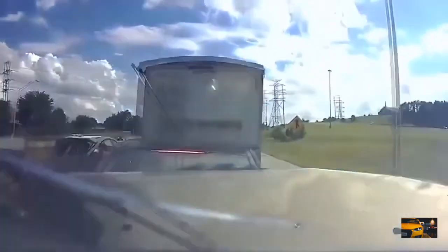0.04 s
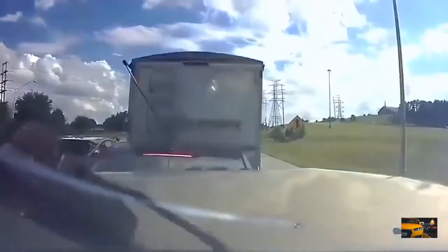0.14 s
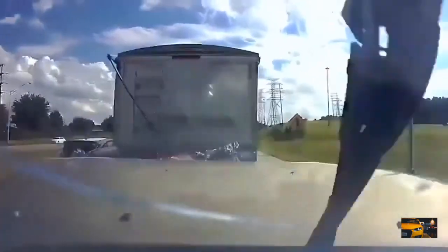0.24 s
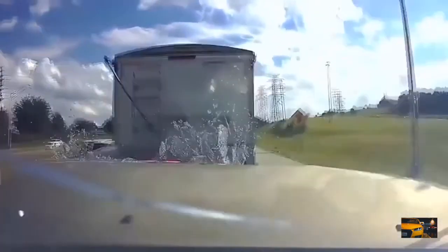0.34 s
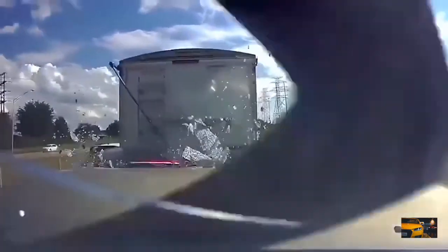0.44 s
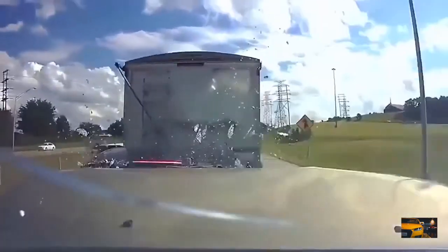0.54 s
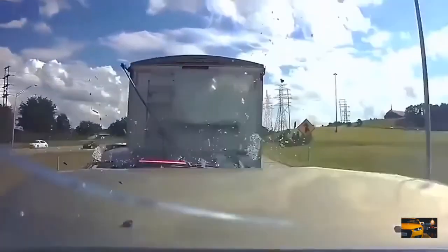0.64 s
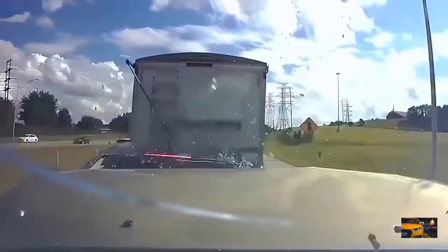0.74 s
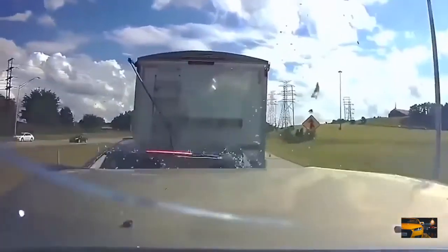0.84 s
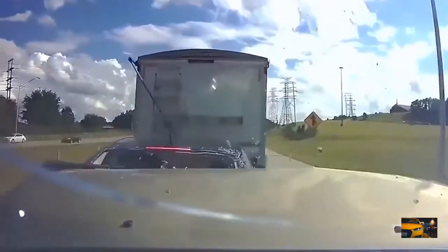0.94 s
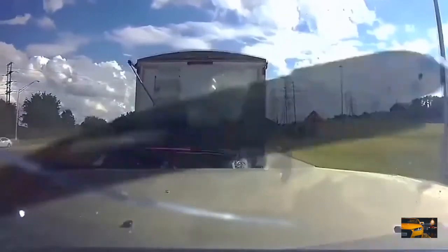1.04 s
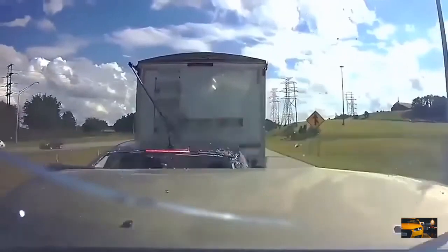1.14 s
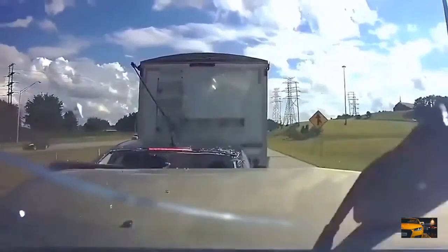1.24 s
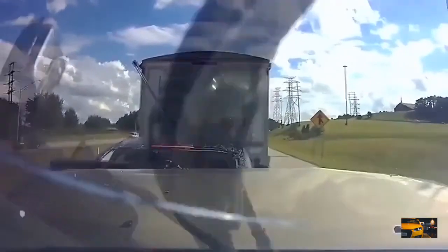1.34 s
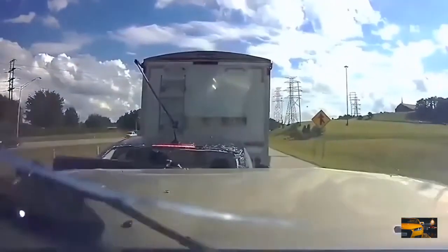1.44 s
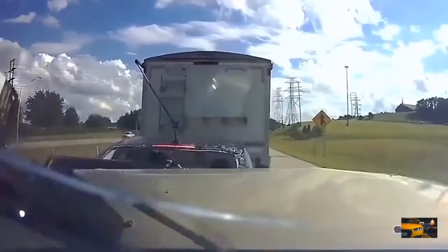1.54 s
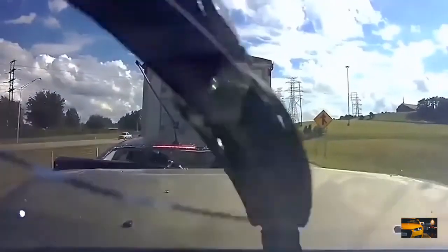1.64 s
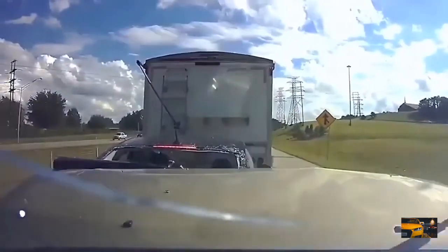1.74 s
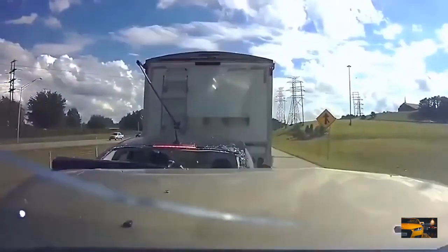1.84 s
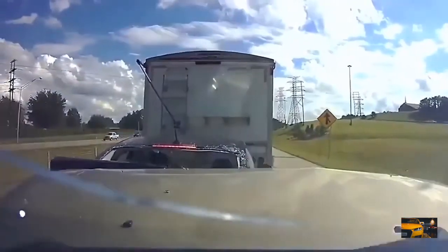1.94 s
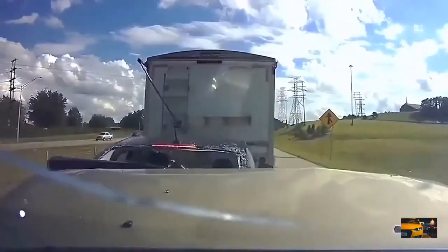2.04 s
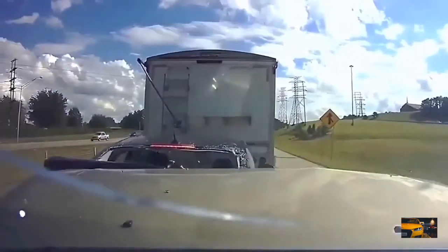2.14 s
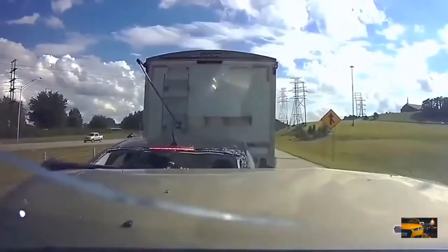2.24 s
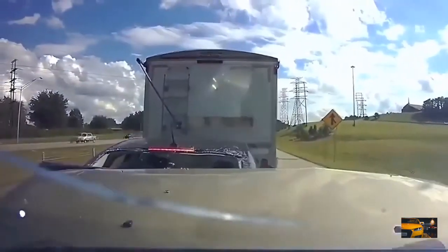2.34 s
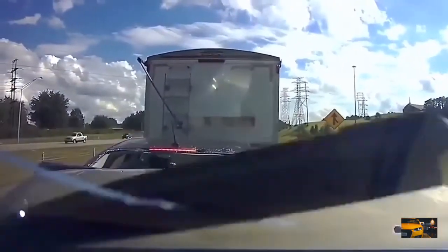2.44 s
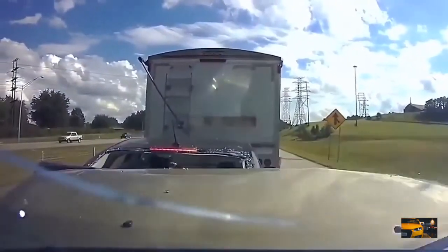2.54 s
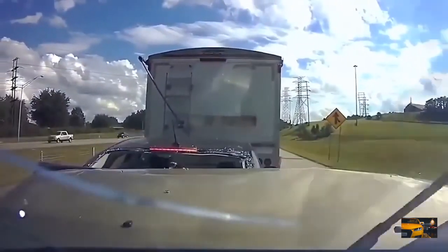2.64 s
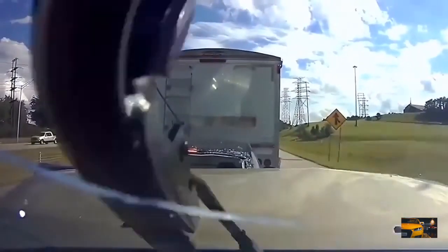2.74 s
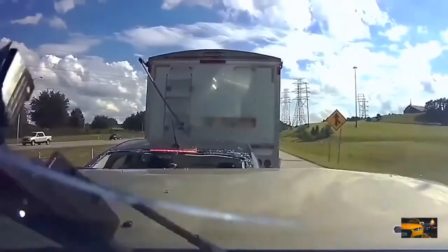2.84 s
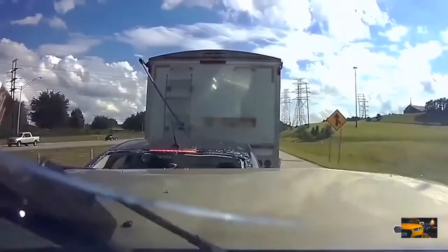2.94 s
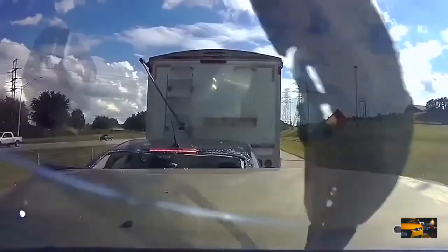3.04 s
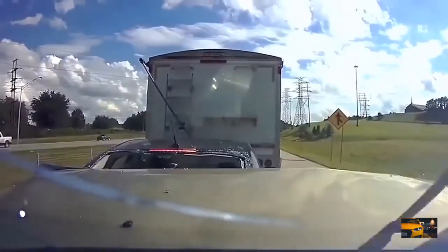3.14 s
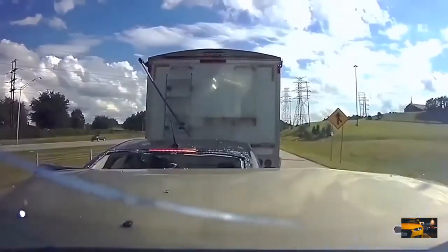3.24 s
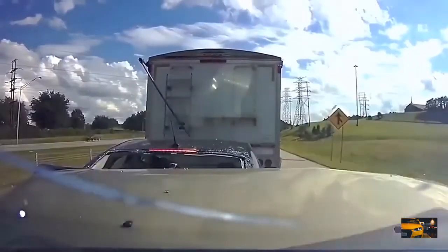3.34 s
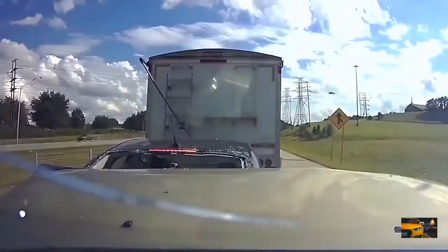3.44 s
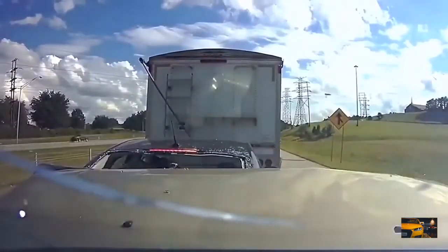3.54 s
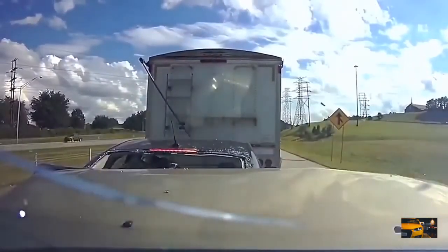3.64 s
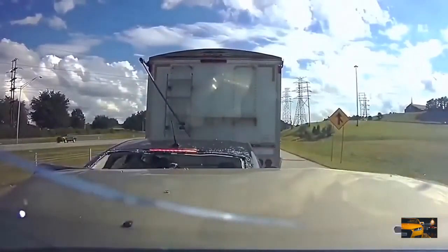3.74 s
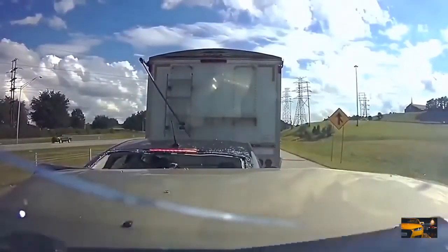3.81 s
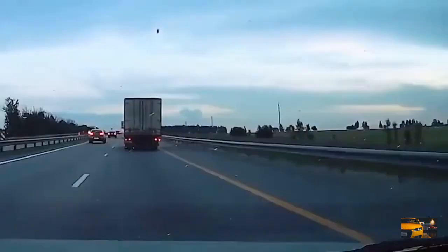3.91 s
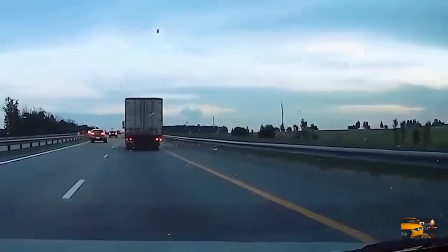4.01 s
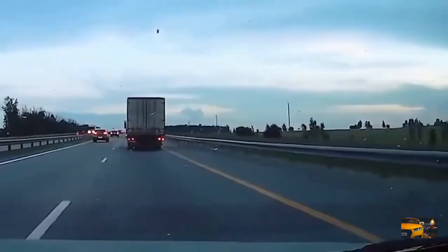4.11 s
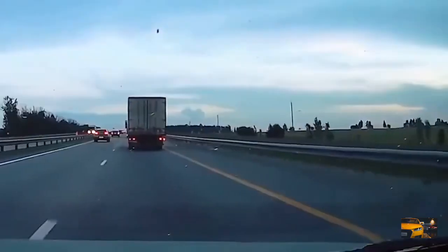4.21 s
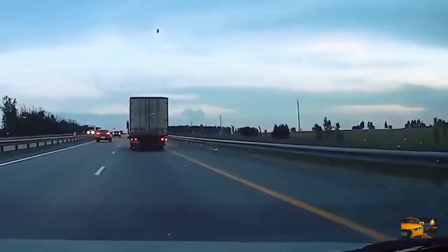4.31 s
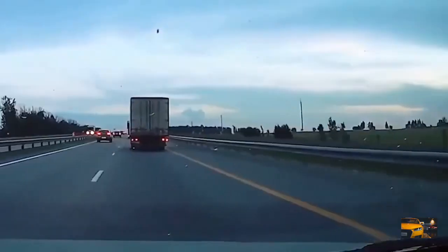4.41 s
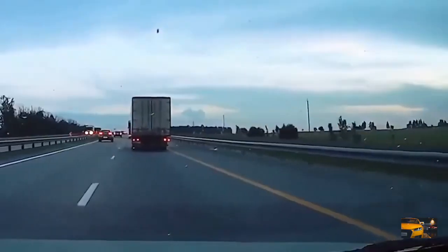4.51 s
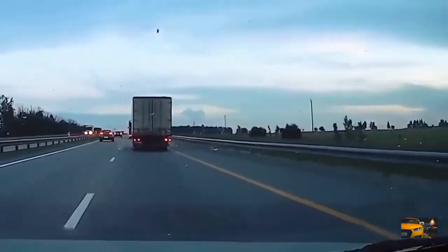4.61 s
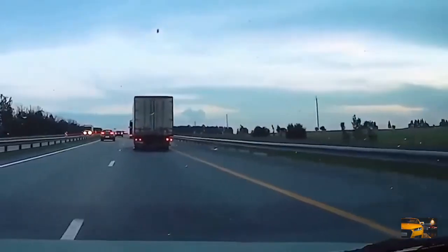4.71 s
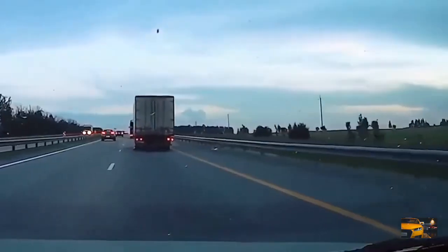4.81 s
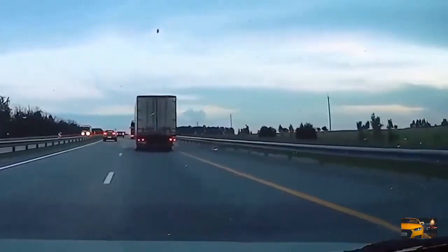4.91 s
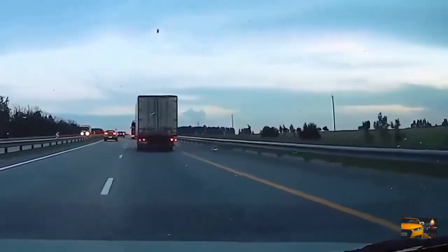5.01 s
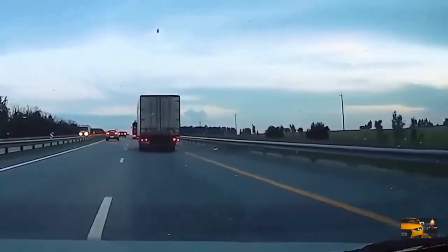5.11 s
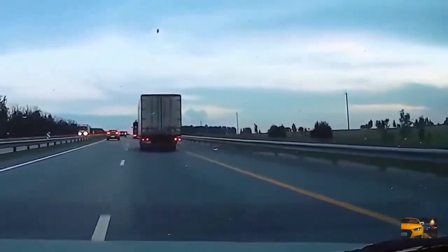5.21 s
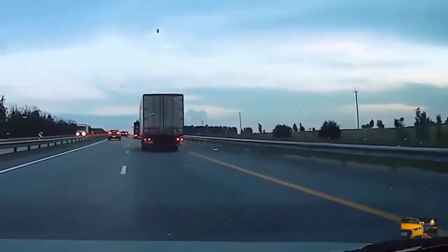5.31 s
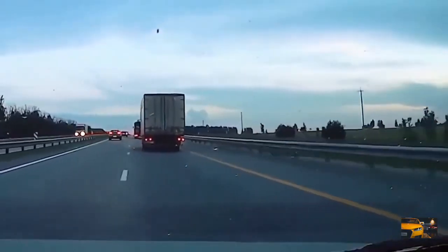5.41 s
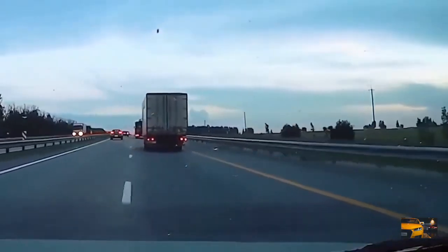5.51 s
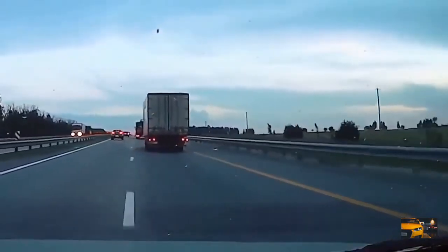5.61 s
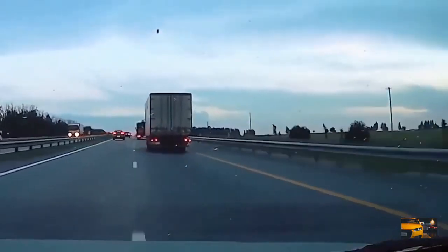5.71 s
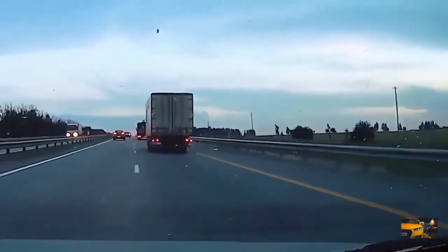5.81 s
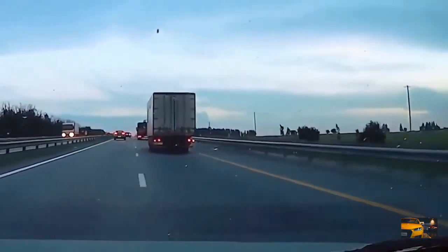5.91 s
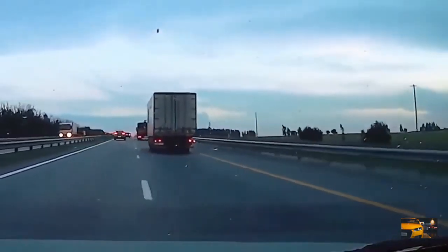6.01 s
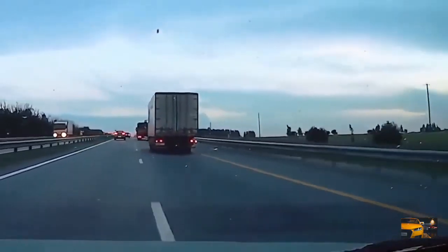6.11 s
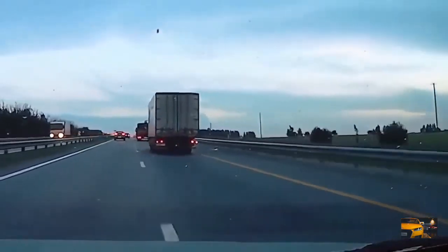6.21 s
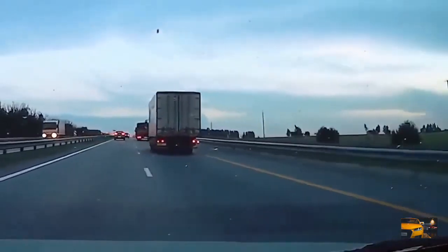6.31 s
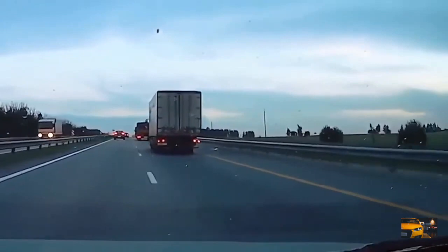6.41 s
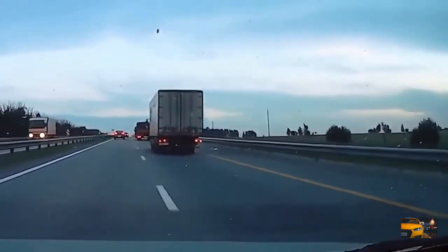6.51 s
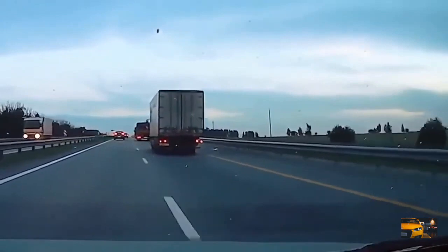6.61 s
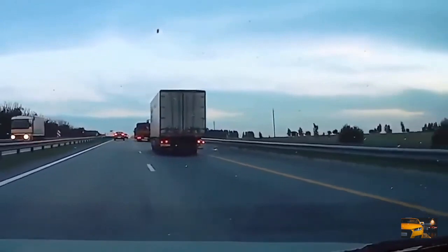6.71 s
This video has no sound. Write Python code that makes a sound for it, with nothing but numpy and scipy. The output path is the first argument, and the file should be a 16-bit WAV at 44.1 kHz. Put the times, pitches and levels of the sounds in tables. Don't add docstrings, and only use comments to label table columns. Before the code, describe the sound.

Violent vehicle impact with buckling metal and pouring shards settles into a faint idle, then switches instantly to quieter tyre roar and engine hum with grit ticks.

```python
import sys
import numpy as np
from scipy import signal
from scipy.fft import rfft, irfft, next_fast_len
from scipy.io import wavfile
from scipy.ndimage import uniform_filter1d, map_coordinates

SR = 44100
rng = np.random.default_rng(int(sys.argv[2]) if len(sys.argv) > 2 else 0)


def boost_factor(decibels):
    exponent = np.asarray(decibels, float) / 20
    return 10 ** exponent


def int16_out(signal):
    q = np.round(np.clip(np.atleast_2d(signal).T, -1, 1) * 32767)
    wavfile.write(sys.argv[1], SR, q.astype(np.int16))


N = 297734
CHANGE_S = 4.042

# frequency in Hz, density in dB per Hz.
HEAVE_SPECTRUM = [(8.8, -41), (15, 2), (38, 1), (52, 0.5), (76, -7.5), (130, -14), (170, -31), (290, -120)]
# frequency in Hz, density in dB per Hz.
BOOM_SPECTRUM = [(53, -34), (90, -1), (118, 2.5), (178, 3.5), (323, -5.5), (391, -5), (447, -14.5),
                 (600, -18), (780, -34.5), (1320, -120)]
# frequency in Hz, density in dB per Hz.
CRUNCH_SPECTRUM = [(260, -37), (450, -1), (478, -6), (616, -3), (765, -2), (926, -2.5), (1080, -6),
                   (1170, -5.5), (1470, -8.5), (1630, -17.5), (1870, -14.5), (2170, -10), (2560, -18),
                   (2820, -14.5), (3600, -25.5), (4680, -40), (7920, -120)]
# frequency in Hz, density in dB per Hz.
SHARD_SPECTRUM = [(1880, -41.5), (3200, 4), (3340, -5), (3570, -7), (3800, -3), (4360, -6.5), (4700, -4),
                  (5930, -4), (7160, -12), (7500, -19), (9750, -35), (16500, -120)]
# frequency in Hz, density in dB per Hz.
VENT_SPECTRUM = [(1470, -35.5), (2500, -11.5), (2590, -12.5), (3190, -7.5), (3830, -10), (4100, -14.5),
                 (4590, -6), (4810, -27), (5390, -10), (5870, -33), (7400, -35), (9620, -64), (16300, -120)]
# frequency in Hz, density in dB per Hz.
HASH_SPECTRUM = [(300, 15.5), (3000, 0.5), (7400, -13), (8500, -28), (12000, -29), (15000, -37)]
# centre in Hz, width in Hz, lift in dB.
TRIM_RESONANCES = [(910, 210, 2), (1493, 116, 8), (2190, 230, 2.5), (2770, 56, 4), (3250, 110, 2),
                   (4510, 69, -3), (5800, 92, 5)]

# peak time in seconds, heave in dB, boom over heave in dB,
# build-up in seconds and die-away in seconds.
JOLTS_TABLE = [(.104, -24, -11, 0.21, 0.14), (.15, -33, 8.5, 0.072, 0.073), (.208, -21.5, -21, 0.17, 0.13),
               (.32, -24, -14, 0.085, .3), (.43, -19, -3, 0.056, 0.22), (.464, -21, 5, 0.1, 0.29),
               (.516, -12.5, -9.5, 0.19, 0.081), (.6, -14.5, -16, 0.033, .08), (.732, -26, 1, 0.23, 0.058),
               (.8, -28, -6, .4, 0.78), (.956, -28.5, 6, 0.062, 0.12), (1.12, -36, 2, 0.13, 0.37),
               (1.528, -39.5, -0.5, 0.043, .1), (1.89, -33, -19, 0.13, 0.077), (1.98, -50, -2, .1, 0.11),
               (2.07, -40.5, -3.5, 0.14, 0.17), (2.62, -32, -10, 0.23, 0.17), (2.78, -34, -15, 0.24, 0.065),
               (3.15, -35.5, -9.5, 0.36, 0.27), (3.22, -31.5, -18, .2, 0.18)]
# peak time in seconds, crunch in dB,
# shards over crunch in dB, build-up in seconds, die-away in seconds.
SLIDES = [(0, -40, -11, .1, 0.72), (.104, -45, -4, 0.33, 0.2), (.264, -45.5, -5.5, 0.24, 0.16),
          (.45, -32.5, -35, 0.12, 0.19), (.516, -25.5, -11, 0.096, 0.18), (.575, -31.5, -5, 0.1, 0.063),
          (.652, -37.5, -2.5, 0.029, 0.29), (.732, -26, -13.5, 0.1, 0.063), (.77, -35, -13, .1, 0.47),
          (.956, -41, -3.5, 0.18, 0.58), (1.054, -37, -9.5, 0.26, 0.41), (1.24, -42, -8, 0.73, 0.28),
          (1.528, -47, -11.5, 0.034, 0.42), (1.89, -56, -12, 0.1, .06), (1.97, -56.5, -9, .1, .08),
          (2.07, -57, -16, .1, .15), (2.62, -55, -27, .03, 0.074), (2.97, -50.5, -13, 0.18, 0.48)]
# heave in dB, boom in dB, crunch in dB, shards in dB.
SETTLED_DB = [-41, -50, -55, -76.5]
# start in seconds, peak in dB, frequency in Hz, t60 in seconds.
MOUNT_SWINGS = [
    (.105, -13, 38, .15),
    (.2, -17, 36, .15),
    (.412, -10, 31, .4),
    (.459, -8, 27, .2),
    (.479, -7.5, 34, .15),
    (.508, -8, 31, .25),
    (.583, -8.5, 39, .4),
    (.951, -14, 70, .12),
]
# start in seconds, peak in dB, mode in Hz, t60 in seconds, share of crunch as a ratio.
TRIM_BLOWS = [(0.154, -28, 152.7, 0.13, 0.33), (0.383, -23, 156, 0.069, 0.21), (0.54, -14, 164, 0.1, 0.71),
              (0.711, -12.5, 202, 0.041, 0.65), (0.729, -1.5, 400, 0.045, 0.25),
              (0.952, -10, 158.5, 0.081, 0.34), (1.201, -16, 411, 0.12, 0.41),
              (1.233, -10, 436, 0.041, 0.32), (1.392, -28.5, 974, 0.22, 1), (1.969, -24, 315, 0.11, 0.14),
              (2.595, -32.5, 221, 0.058, 0.5), (2.623, -26.5, 253, 0.2, 0.4), (3.119, -28, 231, 0.16, 0.12)]
# start in seconds, peak in dB, mode in Hz.
PANEL_SNAPS = [(0.047, -27, 970), (0.188, -29.5, 945), (0.236, -27, 944), (0.292, -27.5, 1340),
               (0.386, -31, 869), (0.415, -23, 750), (0.452, -15, 1205), (0.501, -20.5, 820),
               (0.535, -12.5, 1110), (0.657, -19, 900), (0.708, -17, 794), (0.908, -26, 1370),
               (1.025, -20.5, 1180), (1.105, -28.5, 969), (1.339, -30, 969), (1.378, -30, 980),
               (1.744, -40, 1220), (2.07, -37, 920), (2.431, -46, 813), (2.568, -37, 776),
               (2.625, -41, 926), (2.877, -40.5, 760), (3.093, -38, 859), (3.194, -43, 891)]
# start in seconds, peak in dB, mode in Hz, tilt in dB per octave.
DEBRIS = [(0.315, -31, 2600, 4), (0.446, -35, 2680, 0), (0.4816, -17, 2740, 5), (0.5414, -26, 2990, 0),
          (0.621, -22, 3010, 7), (0.6464, -21, 5500, 2), (0.7124, -15, 3100, 8), (0.79, -24, 2980, -7),
          (0.815, -23, 3170, -10.5), (0.941, -21.5, 2580, 3), (1.1046, -35, 3120, -4),
          (1.3346, -28, 2844, -6), (1.48, -35.5, 2990, -10), (1.532, -26.5, 2990, 9),
          (1.6136, -35, 2910, 4), (1.7452, -27.5, 3040, 1), (1.83, -43, 3280, 2), (1.8652, -39, 2930, 1),
          (1.9288, -36.5, 2960, -5), (2.198, -41, 3146, 8), (2.571, -42, 2950, -12),
          (3.052, -42.5, 5940, 13), (3.1925, -37.5, 5800, 1), (3.5323, -46, 3130, 13)]
# start in seconds, mode in Hz, level in dB, shaking time in seconds.
SHAKEN_PARTS = [(0.058, 948, -38, 0.045), (.13, 950, -39, .03), (.178, 945, -36.5, 0.052),
                (.19, 2200, -49.5, 0.06), (0.648, 2035, -37, 0.06), (0.62, 5720, -40, .025),
                (0.66, 4820, -43, 0.045), (0.672, 3780, -44, .03), (0.7, 1340, -34, 0.058),
                (0.716, 401.6, -29.5, 0.039), (.76, 497, -31, 0.024), (0.91, 2045, -36.5, 0.064),
                (0.962, 3250, -42.5, .035), (.97, 5170, -47, 0.033), (1.02, 5240, -45.5, 0.046),
                (0.97, 4780, -46, 0.043), (1.1, 2060, -47, .07), (3.19, 2700, -58, 0.014),
                (2.965, 900, -50, .015), (1.329, 977, -43, 0.05), (2.041, 920, -46.5, 0.04),
                (1.57, 315, -52.5, .17), (2.974, 2760, -58, 0.046), (3.185, 3090, -60, 0.033),
                (0.644, 5420, -48, 0.03), (1.052, 3230, -44.5, 0.02), (0.908, 1400, -38, .015),
                (1.048, 345, -38, 0.036), (1.31, 855, -47, 0.029), (1.507, 418, -45.5, 0.036)]
# start in seconds, first pitch in Hz, last pitch in Hz,
# level in dB, duration in seconds.
RUBBING_PARTS = [(0.938, 1020, 760, -40, 0.029), (0.954, 340, 440, -34, 0.044), (.989, 678, 862, -31, 0.05),
                 (1.02, 1210, 1133, -31, 0.033), (1.04, 860, 657, -39, .05), (1.032, 1464, 1307, -42, .05),
                 (1.135, 440, 496, -42, .03), (1.19, 381.7, 445, -34.5, 0.0587),
                 (1.2, 1000, 1213, -39, 0.018), (1.255, 760, 620, -42, 0.014),
                 (1.551, 598, 643, -52.5, 0.076), (1.628, 638, 610, -49.5, .12),
                 (2.889, 2300, 2480, -60, 0.079), (2.921, 1420, 1486, -57, .05)]
# time in seconds, whine in Hz, whine level in dB, drone level in dB.
IDLE_COURSE = [(0, 384, -65.5, -43), (1.2, 392.4, -58.5, -56), (1.87, 384.6, -47, -53.5),
               (1.92, 385, -62, -55), (1.98, 384, -45, -49.5), (2.2, 377, -53.5, -50.5),
               (2.32, 377.3, -66, -45), (2.44, 380.5, -42.5, -54), (2.58, 378.6, -52, -46.5),
               (2.64, 379.4, -61, -44.5), (2.7, 372, -45.5, -52), (2.86, 370, -48.5, -43.5),
               (3.0, 368.7, -51, -49), (3.3, 362, -76, -50), (4.05, 363, -75, -56)]

# frequency in Hz, density in dB per Hz.
RUMBLE_SPECTRUM = [(8.8, -39), (15, -14), (27, -12), (53, -20), (70, 2.5), (102, -3.5), (129, 5), (215, -8),
                   (250, -2), (320, -25), (550, -120)]
# centre in Hz, width in Hz, level in dB.
TYRE_CAVITY = [(293.8, 14.7, 3.5), (310, 13, -2)]
# frequency in Hz, density in dB per Hz.
ROAR_SPECTRUM = [(200, -8.5), (340, 2.5), (393, -8.5), (468, -3.5), (566, -7.5), (643, -11), (909, -10),
                 (987, -6.5), (1150, -15), (1250, -13), (2030, -20), (2220, -26.5), (3000, -36),
                 (3900, -58), (6600, -120)]
# frequency in Hz, density in dB per Hz.
HISS_SPECTRUM = [(1500, -40), (2500, -4), (3500, -3), (5000, -9), (5900, -8), (6700, -4), (7500, -11),
                 (8400, -24.5), (10000, -32), (15000, -42.5)]
# multiple of shaft speed, level in dB.
SHAFT_ORDERS = [(1, -52.5), (2, -50), (5, -54.5), (6, -64.5)]
# start in seconds, peak in dB, gain below 4 kHz in dB.
GRIT_HITS = [(4.07, -55.5, 1.5), (4.1047, -49, 2), (4.2095, -54.5, 3), (4.457, -52.5, 0), (4.4869, -61, 2),
             (4.874, -58, 2), (4.922, -40, 5), (4.953, -56, 2), (5.0614, -56, 2), (5.079, -54, 2),
             (5.1243, -53, 3), (5.1474, -50, 1), (5.1835, -55, 2), (5.2761, -57, 2), (5.59, -49, 4),
             (5.6058, -33, 7.5), (5.6818, -51, 8), (5.787, -56, 0), (5.411, -55, 2), (5.9957, -55.5, 5),
             (6.3387, -53, 5), (6.3612, -57, 3), (6.5808, -56, 3)]
# frequency in Hz, gain in dB.
PANE_RESPONSE = [(1500, -5), (3500, -20.5), (5200, -6.5), (6600, 1), (7800, -9), (10000, -23.5),
                 (15000, -23.5)]
# frequency in Hz, density in dB per Hz.
PREAMP_SPECTRUM = [(5000, -32), (8000, 0.5), (15000, -0.5)]


def unit(x):
    return x / np.sqrt(np.mean(x ** 2) + 1e-20)


def along(points, hz):
    f, v = np.transpose(points)
    return np.interp(np.log(hz + 1), np.log(f + 1), v)


def curves(rows):
    s, *cols = np.transpose(rows)
    return [np.interp(np.arange(N) / SR, s, c) for c in cols]


def wobble(rate):
    return map_coordinates(rng.standard_normal(int(N * rate / SR) + 4), [np.arange(N) * rate / SR])


def sine(hz):
    return np.sin(2 * np.pi * np.cumsum(hz) / SR)


def decay(t, t60):
    return boost_factor(-60 * t / t60)


def filtered(x, response):
    m = next_fast_len(len(x) + 8192)
    return irfft(rfft(x, m) * response(np.fft.rfftfreq(m, 1 / SR)), m)[:len(x)]


def rush(spectrum, patchy_db, spiky_db=0):
    grains = rng.standard_normal(N) * boost_factor(spiky_db * wobble(700))
    z = signal.stft(grains, nperseg=512)[2]
    field = uniform_filter1d(rng.standard_normal(z.shape), size=3, axis=0)
    field = uniform_filter1d(field, size=6, axis=1)
    x = signal.istft(z * boost_factor(patchy_db * unit(field)), nperseg=512)[1][:N]
    return unit(filtered(x, lambda hz: boost_factor(along(spectrum, hz))))


def add(track, s, sound):
    part = track[round(s * SR):][:len(sound)]
    part += sound[:len(part)]


def highway():
    def cavity_modes(f):
        modes = sum(boost_factor(db) * 1j * f * w / (c * c - f * f + 1j * f * w) for c, w, db in TYRE_CAVITY)
        return modes / (1 + (f / 600) ** 4)

    surface_db, surface_rate = 1.3, 7
    cavity = unit(filtered(rng.standard_normal(N), cavity_modes))
    cavity = boost_factor(-41 + surface_db * wobble(surface_rate)) * cavity
    rumble = boost_factor(-40 + surface_db * wobble(surface_rate)) * rush(RUMBLE_SPECTRUM, patchy_db=2)
    roar = boost_factor(-38.5 + 0.71 * wobble(12)) * rush(ROAR_SPECTRUM, patchy_db=1)
    hiss = boost_factor(-65.0 + 0.7 * wobble(25)) * rush(HISS_SPECTRUM, patchy_db=1.3, spiky_db=1.5)
    return rumble + cavity + roar + hiss


def engine():
    turn = 2 * np.pi * np.cumsum(38.8 + 0.284 * wobble(1.512)) / SR
    return sum(boost_factor(db + 5.5 + 1.8 * wobble(4)) * np.sin(k * turn) for k, db in SHAFT_ORDERS)


def grit():
    out, t = np.zeros(N), np.arange(SR // 10) / SR
    for s, db, low_db in GRIT_HITS:
        colour = lambda f: boost_factor(along(PANE_RESPONSE, f) + low_db * (f < 4000))
        crack = unit(filtered(rng.standard_normal(len(t)), colour))
        ring = 0.4 * np.sin(2 * np.pi * 6300 * t) + boost_factor(low_db - 18) * np.sin(2 * np.pi * 2320 * t)
        add(out, s, boost_factor(db - 5.5) * decay(t, 0.06) * (crack + ring))
    return out


def idle():
    whine_hz, whine_db, drone_db = curves(IDLE_COURSE)
    whine = boost_factor(whine_db - 2.0 + 3 * wobble(25)) * sine(whine_hz + 10 * wobble(48))
    drone = unit(filtered(rng.standard_normal(N), lambda f: 1 / (1 + ((f - 212) / 20) ** 2)))
    firing = boost_factor(-41 + 1.5 * wobble(6)) * sine(55 + 2.5 * wobble(4))
    return firing + whine + boost_factor(drone_db) * drone


def shaken(s, start_hz, end_hz, db, length):
    t = np.arange(round((length + .05) * SR)) / SR
    shape = (1 - np.exp(-t / 0.002)) * decay(np.clip(t - length, 0, None), 0.066)
    knots = t * (55 + start_hz / 45)
    shake = map_coordinates(rng.standard_normal((2, 64)), [[[0], [1]] + 0 * t, [knots] * 2])
    turn = 2 * np.pi * np.cumsum(start_hz + (end_hz - start_hz) * np.clip(t / length, 0, 1.2)) / SR
    tone = boost_factor(3 * shake[0]) * np.sin(turn + 0.85 * shake[1])
    return boost_factor(db + 1.5) * shape * tone


def rings():
    out = np.zeros(N)
    for s, hz, db, length in SHAKEN_PARTS:
        add(out, s, shaken(s, hz, hz, db, length))
    for row in RUBBING_PARTS:
        add(out, row[0], shaken(*row))
    return out


def ticks():
    out, t = np.zeros(N), np.arange(SR // 10) / SR
    for s, db, hz, tilt_db in DEBRIS:
        def colour(f):
            tilt = boost_factor(tilt_db * np.log2(f / 4500 + .01) - 10 * (f / 7000) ** 4)
            return f * f / (f * f + 1800 ** 2) * tilt

        crack = 2.3 * decay(t, 0.048) * filtered(rng.standard_normal(len(t)), colour)
        mode = 0.5 * decay(t, 0.08) * np.sin(2 * np.pi * hz * t)
        add(out, s, boost_factor(db - 14.0) * (crack + mode))
    return out


def knocks():
    out, t = np.zeros(N), np.arange(SR // 5) / SR
    for s, db, hz, t60, share in TRIM_BLOWS:
        fall = decay(t, np.clip(t60, .03, .2)) * (1 - np.exp(-t / 0.0011))
        burst = unit(filtered(rng.standard_normal(len(t)), lambda f: boost_factor(along(CRUNCH_SPECTRUM, f))))
        add(out, s, boost_factor(db - 6.0) * fall * (np.sin(2 * np.pi * hz * t) + share * burst))
    return out


def cracks():
    out, t = np.zeros(N), np.arange(SR // 20) / SR
    for s, db, hz in PANEL_SNAPS:
        colour = lambda f: (f > 600) * boost_factor(1.08 * along(CRUNCH_SPECTRUM, f))
        burst = decay(t, 0.043) * unit(filtered(rng.standard_normal(len(t)), colour))
        mode = 1.3 * decay(t, 0.041) * np.sin(2 * np.pi * hz * t)
        add(out, s, boost_factor(db - 8.5) * (burst + mode))
    return out


def swings():
    out, t = np.zeros(N), np.arange(SR // 3) / SR
    for s, db, hz, t60 in MOUNT_SWINGS:
        add(out, s, boost_factor(db) * decay(t, t60) * np.sin(2 * np.pi * hz * t))
    return out


def swells(rows):
    s, db, follow_db, up, down = np.transpose(rows)[:, :, None]
    late = np.arange(round(CHANGE_S * SR) + 100) / SR - s
    power = boost_factor(2 * db - 43.7 * np.maximum(-late / np.abs(up), late / np.abs(down)))
    lead, follower = power.sum(axis=0), (power * boost_factor(2 * follow_db)).sum(axis=0)
    return np.pad(np.sqrt([lead, follower]), ((0, 0), (0, N - late.shape[1])))


def tinkle(spectrum, low_hz, high_hz, count):
    when, pitch, size, life = rng.random((count, 4)).T[:, :, None]
    t, hz = np.arange(SR // 12) / SR, low_hz * (high_hz / low_hz) ** pitch
    level = boost_factor(6.7 * size + along(spectrum, hz)) * decay(t, 0.014 + 0.13 * life)
    bend = 1 + 0.44 * (life - size) * t
    tones = level * (1 - np.exp(-t / 0.005)) * np.sin(2 * np.pi * hz * t * bend)
    where = (when * 1.5 * SR).astype(int) + np.arange(len(t))
    x = np.bincount(where.ravel(), tones.ravel())
    return np.pad(unit(x), (0, N - len(x)))


def trim_colour(f):
    return boost_factor(sum(db / (1 + (2 * (f - c) / w) ** 2) for c, w, db in TRIM_RESONANCES))


def wreck():
    gains = np.vstack([swells(JOLTS_TABLE), swells(SLIDES)])
    heaving, booming, crunching, pouring = np.hypot(gains, boost_factor(SETTLED_DB)[:, None])
    heave = rush(HEAVE_SPECTRUM, patchy_db=-5)
    heave_power = np.abs(uniform_filter1d(heave ** 2, size=3000))
    heave = unit(heave / np.sqrt(heave_power + 0.16))
    body = heaving * heave + booming * rush(BOOM_SPECTRUM, patchy_db=2)
    crunch = rush(CRUNCH_SPECTRUM, patchy_db=1.9, spiky_db=1.5)
    crunch = crunch + 0.5 * tinkle(CRUNCH_SPECTRUM, 594.7, 3400, count=260)
    shards = rush(SHARD_SPECTRUM, patchy_db=3.5, spiky_db=1.5)
    shards = shards + 0.46 * tinkle(SHARD_SPECTRUM, 3300, 7200, count=320)
    vent = boost_factor(-70.0) * rush(VENT_SPECTRUM, patchy_db=4.0)
    return body + filtered(boost_factor(1.5) * crunching * crunch + pouring * shards + vent, trim_colour)


def first_microphone(x):
    over = np.clip(uniform_filter1d(1. * (np.abs(x) > .17), size=2600) - .09, 0, 1)
    crunch = np.sqrt(np.abs(uniform_filter1d(filtered(x, lambda hz: hz > 900) ** 2, size=1200)))
    x = x / (1 + np.abs(x / .28) ** 7) ** (1 / 7)
    x = filtered(x, lambda hz: np.clip((7480 - hz) / 120, 0, 1))
    mirror = x * np.cos(2 * np.pi * 16000 * np.arange(N) / SR)
    mirror = filtered(mirror, lambda hz: (hz > 8000) * np.exp(-((hz - 8700) / 120) ** 2))
    spit = boost_factor(23.5) * np.sqrt(over) * np.minimum(crunch, .06) ** 2 * boost_factor(1.4 * wobble(60))
    hash_noise = (spit + boost_factor(-76.5)) * rush(HASH_SPECTRUM, patchy_db=2)
    return x + boost_factor(-14.5) * mirror + hash_noise


def scene():
    cruise = highway() + engine() + grit() + boost_factor(-77.5) * rush(PREAMP_SPECTRUM, patchy_db=0.0)
    cab = first_microphone(idle() + rings() + ticks() + knocks() + cracks() + swings() + wreck())
    after = np.clip((np.arange(N) / SR - CHANGE_S) / .001, 0, 1)
    return (cab * (1 - after) + cruise * after)[None]


def low_pass(x):
    return signal.sosfilt(signal.butter(12, 15030, fs=SR, output="sos"), x)


def record(dry):
    return low_pass(dry)


dry = scene()
out = record(dry)
int16_out(out)
```